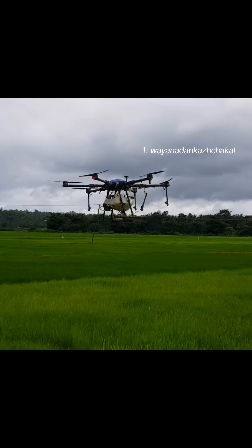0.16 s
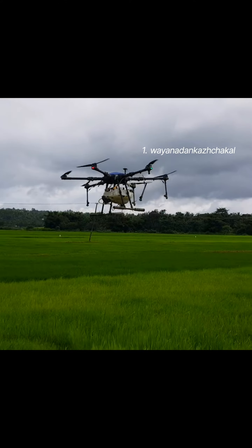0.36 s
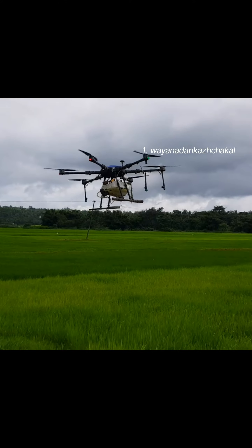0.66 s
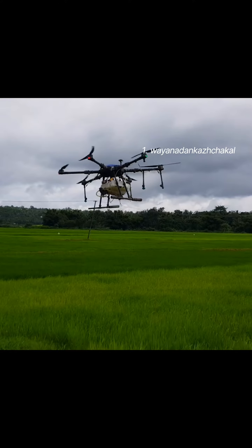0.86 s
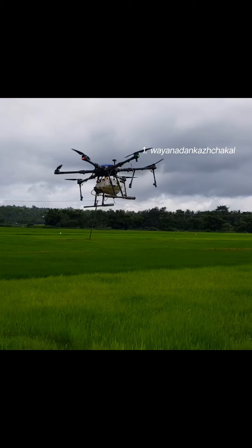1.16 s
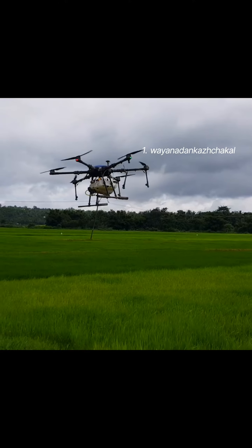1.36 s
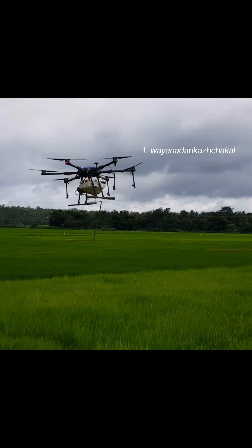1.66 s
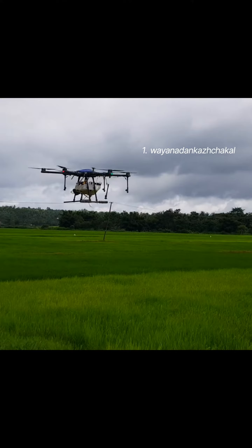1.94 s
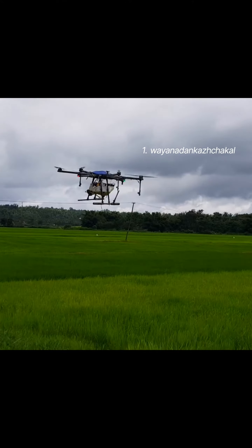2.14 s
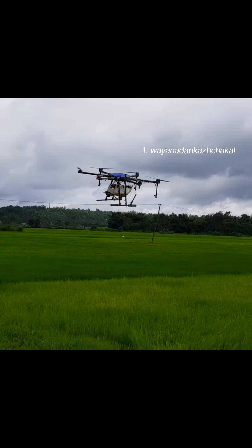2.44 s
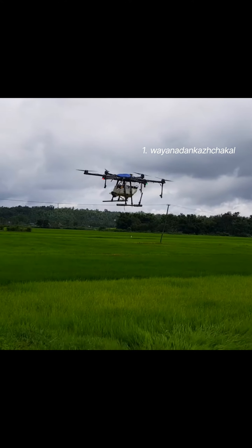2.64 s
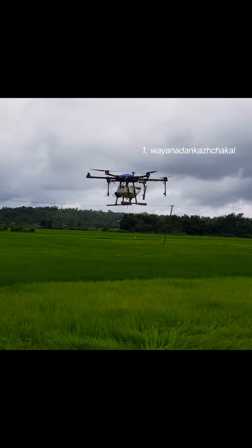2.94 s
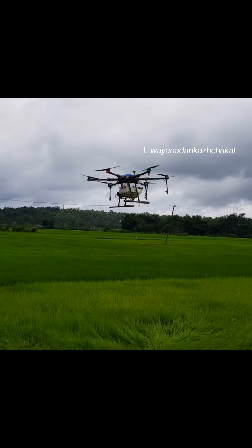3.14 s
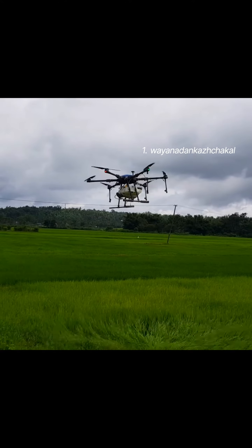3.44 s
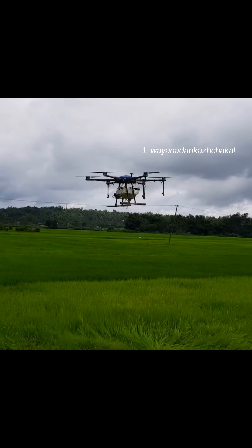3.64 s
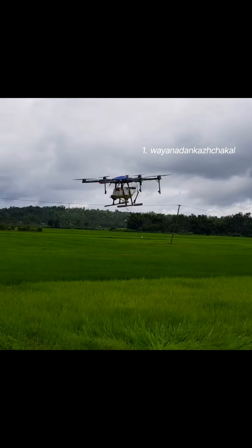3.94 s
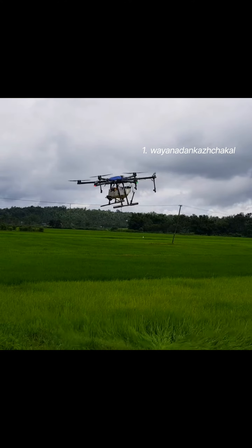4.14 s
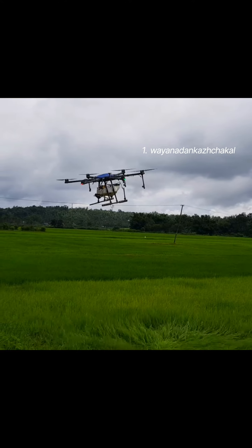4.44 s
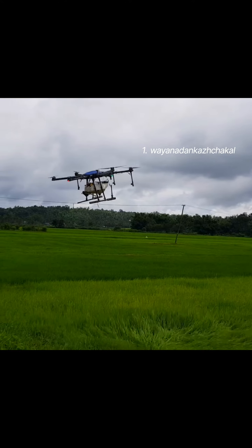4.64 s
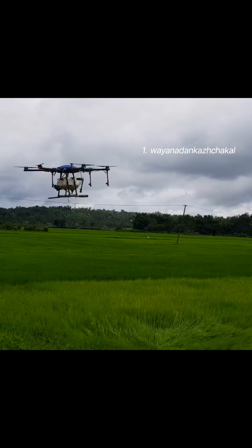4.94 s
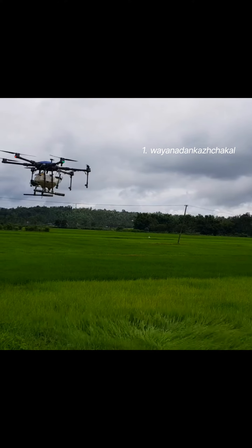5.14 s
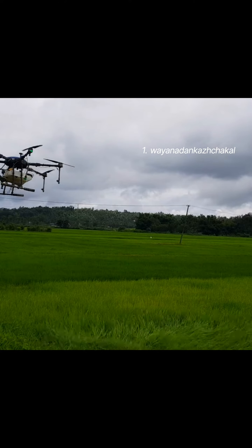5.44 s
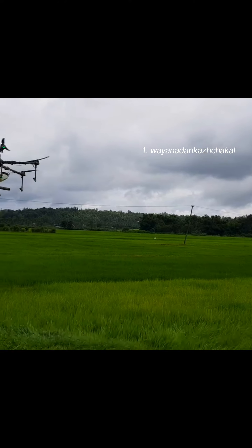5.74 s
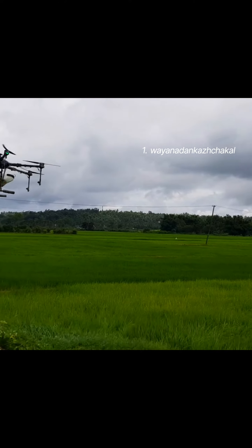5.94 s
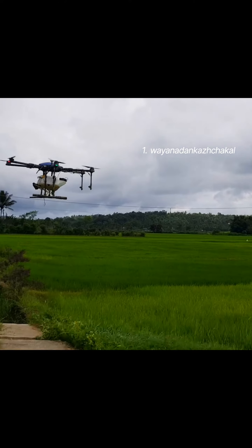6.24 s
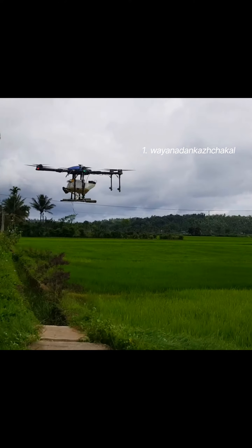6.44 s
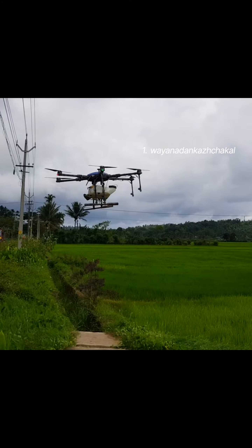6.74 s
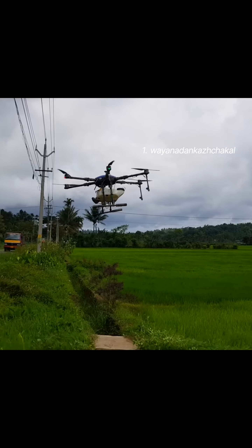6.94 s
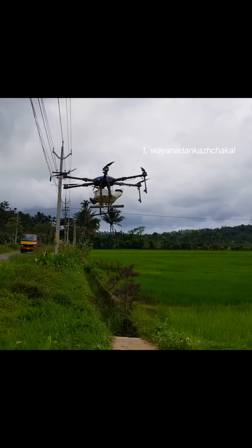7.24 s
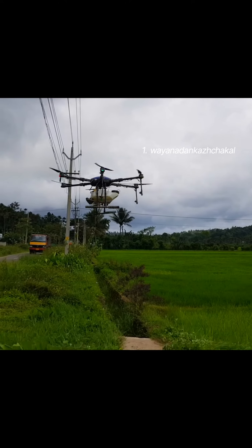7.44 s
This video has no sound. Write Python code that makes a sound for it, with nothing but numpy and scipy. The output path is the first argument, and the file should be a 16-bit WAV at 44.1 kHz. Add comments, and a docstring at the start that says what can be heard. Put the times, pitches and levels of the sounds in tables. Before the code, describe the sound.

A large six-rotor drone hovers low and close outdoors, its blades droning in a wavering, beating hum with airy rush and hiss.

```python
"""A six-rotor spraying drone hovers and sidles low over an open paddy field, a few metres from two mic ports.
From the start four fast and two slower rotors beat as their wandering speeds drive harmonic tones;
shaped noise makes the downwash rumble and the blades rush, and one tip chirps once a turn in the hiss.
Wakes slap a rotor now and then, hardest near 3.5 s; chirp and hiss sink after 2 s.
The chirp returns near 5 s and climbs in pitch to the end, while the treble leans to the right."""
import sys
import numpy as np
from scipy import signal
from scipy.fft import rfft, irfft, next_fast_len
from scipy.io import wavfile
from scipy.ndimage import uniform_filter1d

SR = 44100
rng = np.random.default_rng(int(sys.argv[2]) if len(sys.argv) > 2 else 0)


def file_out(sig):
    """Save sig as 16-bit WAV at sys.argv[1]."""
    # one column per channel
    cols = np.atleast_2d(sig).T
    # limit, then scale
    lim = np.clip(cols, -1, 1)
    pcm = np.round(lim * 32767).astype(np.int16)
    wavfile.write(sys.argv[1], SR, pcm)


N = 334760
THIN = 8  # samples per step of the coarse clock, which is enough for the tones
T = np.arange(N) / SR
T_LOW = T[::THIN]

# All level tables are relative: the layers that read them add constant trims.
# air rushing off the blades: (time [s], level [dB])
RUSH_LEVEL = [(0, -37.5), (.2, -39.5), (.62, -36.5), (1.15, -37.5), (1.28, -36), (1.5, -39), (1.72, -38),
              (1.95, -39.5), (2.3, -37), (2.6, -38), (2.92, -40.5), (3.45, -37), (3.65, -39), (4, -41.5),
              (4.72, -40), (5.12, -40.5), (5.27, -35.5), (5.8, -36), (6.08, -38), (6.24, -36), (6.36, -40),
              (6.8, -41), (7.42, -39), (7.59, -42.5)]
# hiss at the blade tips: (time [s], level [dB])
TIP_HISS_LEVEL = [(0, -41), (.3, -37.5), (.6, -36.5), (1.4, -38), (1.8, -41), (2.1, -45), (2.9, -45.5),
                  (3.25, -44), (3.48, -43), (3.8, -45.5), (4.55, -44.5), (4.9, -42), (5.15, -42.5),
                  (5.55, -38.5), (6.15, -43), (6.65, -44), (7.05, -43.5), (7.59, -44)]
# strength of the downwash: (time [s], level [dB])
DOWNWASH_LEVEL = [(0, -37), (.25, -40), (.65, -42), (.8, -29), (.98, -38), (1.55, -37), (2.1, -41),
                  (2.75, -40), (2.83, -35), (2.95, -38), (3.25, -50), (3.44, -33), (3.7, -40), (4.0, -41.5),
                  (4.95, -40), (5.25, -37.5), (5.78, -37.5), (6.2, -38.5), (6.52, -44), (7.05, -38),
                  (7.59, -37.5)]


def from_db(db):
    """Decibels to gain."""
    return 10 ** (np.asarray(db) / 20)


# the four fast rotors; the far ones are shaded by the body and the tank
NEAR_GAIN = from_db([2.0, -1.5, -0.5, -4.0])


def rms_one(x):
    """Scale to unit power."""
    return x / np.sqrt(np.mean(np.abs(x) ** 2) + 1e-20)


def in_time(rows, t):
    """The columns of a curve table at times t."""
    s, *columns = np.transpose(rows)
    return [np.interp(t, s, c) for c in columns]


def at_hz(points, hz):
    """Read a spectrum on a log-frequency axis."""
    freq, value = np.transpose(points)
    return np.interp(np.log(np.maximum(hz, 1)), np.log(freq), value)


def highpass(sound, order, hz):
    """The part of a sound above a corner frequency, without delay."""
    return signal.sosfiltfilt(signal.butter(order, hz, "high", fs=SR, output="sos"), sound)


def drift(rate):
    """Smooth random wander of unit power on the coarse clock; rate is its corner in Hz."""
    settle = SR // THIN  # one second for the smoothing to settle
    r = np.exp(-2 * np.pi * rate * THIN / SR)
    slow = signal.lfilter([1], [1, -2 * r, r * r], rng.standard_normal(len(T_LOW) + settle))
    return rms_one(slow[settle:])


def shaft_angle(blade_hz):
    """Two blades pass on every turn of the shaft."""
    return np.pi * np.cumsum(blade_hz) * THIN / SR + rng.uniform(0, 2 * np.pi)


def partial(blade_hz, order, rough, flutter_rate):
    """One shaft harmonic of a rotor, shaken by gusty inflow."""
    phase = order * shaft_angle(blade_hz)
    in_phase = 1 + rough * drift(flutter_rate)
    quadrature = rough * drift(flutter_rate)
    return np.cos(phase) * in_phase + np.sin(phase) * quadrature


def overtones(blade_hz, orders, shape, odd_db, rough, flutter_rate):
    """A run of shaft harmonics of one rotor; unequal blades give the odd ones."""
    # how much the unequal blades show, before each layer's offset:
    # (time [s], odd shaft harmonics against even ones [dB])
    odd_level = [(0, -4), (1.7, -12.5), (3.0, -7), (7.59, -1)]
    odd = from_db(odd_db + in_time(odd_level, T_LOW)[0])
    out = 0
    for k in orders:
        strength = from_db(at_hz(shape, k * blade_hz / 2))
        if k % 2:
            strength = strength * odd
        out = out + strength * partial(blade_hz, k, rough, flutter_rate)
    return out


def steady(x, seconds):
    """Even out the level over stretches of this length; quicker beats stay."""
    power = uniform_filter1d(np.abs(rms_one(x)) ** 2, max(1, int(seconds * SR / THIN)))
    return x / np.sqrt(np.mean(np.abs(x) ** 2) * (power + 0.03))


def spread(voices, width):
    """Alternate voices lean to opposite ports around a steadied sum."""
    voices = np.array(voices)
    side = rms_one(voices[::2].sum(axis=0) - voices[1::2].sum(axis=0))
    return steady(voices.sum(axis=0), seconds=0.33) + width * side * [[1], [-1]]


def air_noise(shape, gust_db):
    """Stereo turbulence: each octave gusts on its own, and the ports' likeness varies with frequency."""
    # the two microphone ports: (frequency [Hz], likeness [correlation, -1 to 1])
    port_likeness = [(30, 0.17), (60, .05), (130, 1), (300, 0.76), (640, 0.88), (1400, 0.66), (3100, 0.44),
                     (5500, 0.041), (15000, 0.048)]
    size = next_fast_len(N, True)
    hz = np.arange(size // 2 + 1) * SR / size
    mid, side = rfft(rng.standard_normal((2, size))) * from_db(at_hz(shape, hz))
    alike = np.clip(at_hz(port_likeness, hz), -1, 1)
    spectrum = np.sqrt(1 + alike) * mid + np.sqrt(1 - alike) * side * [[1], [-1]]
    octave = np.log2(np.clip(hz, shape[0][0], shape[-1][0]) / shape[0][0])
    out = 0
    for k in range(int(octave[-1]) + 2):
        overlap = np.maximum(1 - np.abs(octave - k), 0)
        band = irfft(spectrum * overlap, size)[:, :N]
        out = out + band * from_db(gust_db * np.interp(T, T_LOW, drift(12.5)))
    return rms_one(out)


def rotor_speeds(trim_hz, jitter_hz, fast_gap_hz, slow_gap_hz):
    """Three rotors set the pace; the other three follow their neighbours, each with a trim of its own."""
    # rotor speeds before random jitter: (time [s], blade passes [per s])
    lead_speed = [(0, 162), (.24, 152), (1, 162), (1.6, 160.5), (1.75, 165), (2, 160), (2.3, 163),
                  (2.85, 164), (3, 158.5), (3.5, 164), (3.8, 159), (3.97, 167), (4.25, 170), (4.87, 166),
                  (5, 158), (5.58, 163), (5.76, 168), (6.6, 169), (6.9, 163), (7.6, 163)]
    second_speed = [(0, 165), (.26, 147), (.46, 155), (1, 161), (1.77, 166), (2.03, 155), (2.83, 155),
                    (3.3, 163), (3.43, 177), (3.51, 177), (3.62, 166), (3.75, 160), (4.15, 171),
                    (5.12, 159), (5.42, 166), (6.6, 174), (6.88, 162), (7.6, 165)]
    slow_speed = [(0, 126), (1, 131), (1.95, 127), (2.85, 134), (3.1, 126), (3.6, 124), (4.2, 132),
                  (5.05, 128), (5.38, 133), (6.7, 128), (7, 124), (7.6, 128)]
    lead, second, slow = (in_time(rows, T_LOW)[0] for rows in (lead_speed, second_speed, slow_speed))
    lead_follower = lead + fast_gap_hz + trim_hz * drift(1.3)
    second_follower = second - 2.5 + trim_hz * drift(1.27)
    slow_follower = slow - slow_gap_hz + trim_hz / 2 * drift(2.516)
    groups = [lead, lead_follower, second, second_follower], [slow, slow_follower]
    return [[hz + jitter_hz * drift(12.46) for hz in group] for group in groups]


def beating_hum(blade_hz):
    """Like rotors lose one blade pass on the nearest of them from each beat to the next."""
    # the fast rotors fall out of step and their hums cancel:
    # (time [s], depth of the beat [dB], negative where they add instead)
    beats = [(.02, 4), (.15, 17), (.24, 0), (.42, 4), (.62, 18), (.71, 19), (.79, 9), (.89, 7), (1.01, 18),
             (1.09, 16), (1.22, 2), (1.37, 2), (1.58, 6), (1.7, 1), (1.81, 19), (1.89, 6), (2.09, 8),
             (2.22, 15), (2.35, -4), (2.48, 14), (2.63, 19), (2.74, 16), (2.95, 7), (3.22, 0), (3.42, 10),
             (3.57, 7), (3.71, 23), (3.9, 27), (4.06, 0), (4.16, 9), (4.3, 14), (4.52, 4), (4.829, 1),
             (4.97, 12), (5.1, 0), (5.25, 3), (5.4, 5), (5.6, 13), (5.73, 2), (5.91, 9), (6.05, 1),
             (6.19, 9), (6.33, 8), (6.46, 5), (6.57, 15), (6.68, 15), (6.83, 3), (6.99, 12), (7.16, 22),
             (7.27, -7), (7.42, 17), (7.55, 10)]
    s, depth_db = np.transpose(beats)
    slip = -2 * np.pi * np.interp(T_LOW, s, np.arange(len(s)))
    trough = from_db(-np.interp(T_LOW, s, depth_db))
    others = (1 - trough) / (1 + trough)
    tone = np.exp(2j * shaft_angle(blade_hz)) * (1 - others * np.exp(1j * slip))
    return np.sqrt(2 / (1 + others ** 2)) * tone.real


def slow_hum(speeds, follower_db):
    """The blade tones of the two slow rotors beat a few times a second."""
    first, second = (np.cos(2 * shaft_angle(hz)) for hz in speeds)
    return rms_one(first + from_db(follower_db) * second)


def blade_hum(fast, slow):
    """The blade-passing tones of the fast and slow rotors."""
    # fast-rotor hum averaged over a beat, then slow-rotor hum: (time [s], level [dB])
    fast_level = [(0, -27), (.17, -36.5), (.36, -24.5), (.49, -24.5), (.65, -36), (.82, -26.5),
                  (.94, -24.5), (1.04, -40), (1.14, -25), (1.27, -23.5), (1.37, -42), (1.5, -25),
                  (1.86, -37), (2.0, -31), (2.54, -31.5), (2.68, -33.5), (3.1, -26), (3.38, -28.5),
                  (3.5, -29.5), (3.62, -35), (3.98, -29), (4.22, -25), (4.55, -33), (4.74, -25.5),
                  (4.89, -28), (5.0, -40), (5.18, -26.5), (5.32, -28.5), (5.6, -36), (5.84, -26.5),
                  (6.05, -36.5), (6.3, -28), (6.9, -28), (7.35, -36.5), (7.59, -53)]
    slow_level = [(0, -31), (.22, -47), (.38, -32), (1.15, -35), (1.7, -39), (2.3, -35), (2.9, -33.5),
                  (3.5, -48), (3.8, -39), (4.5, -34.5), (5, -40), (5.27, -33), (5.9, -37), (6.5, -36),
                  (7.25, -38), (7.37, -41), (7.59, -33.5)]
    fast_gain = from_db(in_time(fast_level, T_LOW)[0] - 4.0)
    slow_gain = from_db(in_time(slow_level, T_LOW)[0] - 4.5)
    return fast_gain * beating_hum(fast[0]) + slow_gain * slow_hum(slow, follower_db=-7.0)


def throb(fast, slow, fast_db):
    """Unbalanced propellers pulse the downwash once a turn."""
    once = [np.cos(shaft_angle(hz)) for hz in slow]
    once += [from_db(fast_db) * np.cos(shaft_angle(fast[1]))]
    return from_db(in_time(DOWNWASH_LEVEL, T_LOW)[0] - 3.0) * spread(once, width=0.16)


def burr(rotors, slow):
    """Rough third shaft harmonics, with the fourth of the slow rotors, between the first two blade tones."""
    # burr: (time [s], level [dB])
    burr_level = [(0, -36), (.25, -45), (.65, -57), (.85, -39.5), (2.5, -40), (2.9, -36.5), (4.2, -39.5),
                  (5.05, -39), (5.5, -36), (6.8, -35.5), (7.59, -39.5)]
    voices = [near * partial(hz, order=3, rough=0.53, flutter_rate=4.9) for hz, near in rotors[:2]]
    voices += [partial(hz, order=4, rough=0.37, flutter_rate=3.0) for hz in slow]
    voices += [from_db(-4.5) * partial(slow[0], order=3, rough=0.53, flutter_rate=5.0)]
    return from_db(in_time(burr_level, T_LOW)[0] - 5.0) * spread(voices, width=0.23)


def second_blade_tone(rotors):
    """The octave of the fast rotors' hum: four shaft cycles a turn."""
    # second blade tone: (time [s], level [dB])
    octave_level = [(0, -39), (.1, -33), (.17, -51), (.34, -51), (0.409, -30), (.6, -37), (.82, -31.5),
                    (1.7, -32), (1.95, -39.5), (2.2, -43), (2.3, -39.5), (2.85, -38.5), (2.99, -45),
                    (3.12, -40.5), (3.45, -31), (3.65, -40), (3.8, -53), (3.93, -39.5), (4.48, -43),
                    (4.58, -39), (5.1, -40), (5.2, -31), (5.35, -38.5), (6.05, -37.5), (6.24, -38),
                    (6.5, -38), (7.59, -40.5)]
    voices = [near * partial(hz, order=4, rough=0.31, flutter_rate=5.5) for hz, near in rotors]
    voices[1] = voices[1] * from_db(1.5)
    return from_db(in_time(octave_level, T_LOW)[0] - 4.5) * spread(voices, width=0.15)


def growl_and_buzz(rotors, slow):
    """Low and middle runs of shaft harmonics from all six rotors."""
    # overtones: (time [s], low growl level [dB], middle buzz level [dB])
    tone_levels = [(0.0, -32.5, -34), (0.24, -44, -40), (0.45, -30.5, -40.5), (0.65, -37.5, -43),
                   (1.0, -29.5, -37.5), (1.2, -35, -39), (1.42, -29, -35), (1.78, -28.5, -38.5),
                   (1.93, -40, -42), (2.5, -36.5, -41), (2.96, -34, -45), (3.1, -29.5, -36),
                   (3.4, -31, -39.5), (3.82, -34, -49), (4.14, -36, -40), (5.1, -36.5, -38.5),
                   (5.3, -31.5, -34.5), (5.55, -35.5, -38), (5.8, -34, -31.5), (6.05, -35, -33.5),
                   (6.16, -36, -39), (6.25, -36.5, -35), (6.7, -34.5, -33.5), (7.31, -32.5, -32),
                   (7.59, -37, -37.5)]
    # strength of the overtones in each run: (frequency [Hz], level [dB])
    growl_shape = [(370, -4.5), (415, 3), (490, 1), (540, 1.5)]
    buzz_shape = [(500, -13), (590, 2), (670, 5), (745, -23)]
    growl_db, buzz_db = in_time(tone_levels, T_LOW)
    growl = [near * overtones(hz, range(5, 7), growl_shape, odd_db=-0.5, rough=0.14, flutter_rate=2.1)
             for hz, near in rotors]
    growl[0] = growl[0] * from_db(5.5)  # the nearest rotor growls loudest
    growl += [from_db(-2.0) * overtones(hz, range(6, 9), growl_shape, odd_db=4.0, rough=0.36, flutter_rate=8.4)
              for hz in slow]
    buzz = [near * overtones(hz, range(7, 10), buzz_shape, odd_db=7.0, rough=0.19, flutter_rate=4.4)
            for hz, near in rotors]
    buzz += [from_db(4.5) * overtones(hz, range(9, 12), buzz_shape, odd_db=3.5, rough=0.057, flutter_rate=11)
             for hz in slow]
    growl_sound = from_db(growl_db - 5.0) * spread(growl, width=0.18)
    return growl_sound + from_db(buzz_db - 4.5) * spread(buzz, width=0.25)


def rasp(rotors):
    """High shaft harmonics of three fast rotors, shaken hard by the inflow."""
    # rasp: (time [s], level [dB])
    rasp_level = [(0, -41), (1.25, -43.5), (2.5, -45.5), (3.5, -41), (3.9, -49), (4.5, -47), (5.1, -52),
                  (5.3, -45), (6.25, -44.5), (7.1, -43), (7.59, -40)]
    # strength of its overtones: (frequency [Hz], level [dB])
    rasp_shape = [(750, -10.5), (1150, 1), (1450, -9), (1650, -2), (2000, -13.5), (2600, -2)]
    voices = [near * overtones(hz, range(10, 31), rasp_shape, odd_db=-1.0, rough=1.0, flutter_rate=9.3)
              for hz, near in rotors[:3]]
    return from_db(in_time(rasp_level, T_LOW)[0] - 2.5) * spread(voices, width=0.3)


def rotor_tones(fast, slow):
    """Hum, throb, burr, octave, growl, buzz and rasp of the six rotors."""
    rotors = list(zip(fast, NEAR_GAIN))
    out = blade_hum(fast, slow) + throb(fast, slow, fast_db=-1.0)
    out = out + burr(rotors, slow) + second_blade_tone(rotors)
    out = out + growl_and_buzz(rotors, slow) + rasp(rotors)
    return signal.resample_poly(out, THIN, 1, axis=1)[:, :N]


def downwash_rumble():
    """Low turbulence in the air driven down by the rotors."""
    # downwash turbulence: (frequency [Hz], density [dB per Hz])
    wash_shape = [(12, -24), (25, -19), (36, 2), (49, 13), (70, 15), (100, 3), (200, -2), (400, -7),
                  (1000, -38)]
    return from_db(in_time(DOWNWASH_LEVEL, T)[0] - 3.5) * air_noise(wash_shape, gust_db=2)


def chopped(noise, blade_hz, share):
    """The next blade cuts the same eddy again, so part of the noise repeats one blade pass later."""
    earlier = T - 1 / np.interp(T, T_LOW, blade_hz)
    repeat = np.array([np.interp(earlier, T, channel) for channel in noise])
    return rms_one(noise + share * repeat)


def with_air(usual_db, rush_share, hiss_share):
    """Gain of a layer that swells with the blade rush and the tip hiss, by these shares of their swings in dB."""
    (rush_db,), (hiss_db,) = in_time(RUSH_LEVEL, T), in_time(TIP_HISS_LEVEL, T)
    rush_swing, hiss_swing = rush_db + 38.5, hiss_db + 41  # from their usual levels
    return from_db(usual_db + rush_share * rush_swing + hiss_share * hiss_swing)


def blade_rush(fast, swish, bright_hz):
    """Trailing-edge noise swells as each blade swings towards the listener, and brightens with the tip hiss."""
    # turbulence: (frequency [Hz], density [dB per Hz])
    rush_shape = [(20, 0), (50, 3), (100, 6.5), (230, 1.5), (400, 2), (750, 0), (1400, -2.5), (2000, -2),
                  (3000, -1.6), (4200, 1), (5200, -3), (6200, -7), (7000, -18), (8000, -43), (9500, -65)]
    passing = sum(np.cos(2 * shaft_angle(hz)) for hz in fast[:2])
    swell = rms_one(1 + swish * np.interp(T, T_LOW, passing))
    noise = chopped(air_noise(rush_shape, gust_db=1.0), fast[0], share=0.17)
    treble = highpass(noise, 4, bright_hz)
    noise = noise - treble + treble * with_air(usual_db=-2.0, rush_share=0.026, hiss_share=0.52)
    return from_db(in_time(RUSH_LEVEL, T)[0] + 4.5) * swell * noise


def tip_whistle(blade_hz, centre_hz, doppler, beam, line_hz, uneven_db):
    """Vortices shed from one tip whistle; its approach sweeps the pitch up in a short chirp on every turn."""
    angle = np.interp(T, T_LOW, shaft_angle(blade_hz))
    wander = np.array([np.interp(T, T_LOW, drift(1200)) for port in range(2)])
    pitch = centre_hz * (1 + doppler * np.sin(angle)) + line_hz * wander
    uneven = from_db(uneven_db * np.interp(T, T_LOW, drift(40)))
    facing = np.exp(beam * (np.cos(angle) - 1)) * uneven
    chirps = facing * np.cos(2 * np.pi * np.cumsum(pitch, axis=1) / SR)
    return rms_one(signal.sosfilt(signal.butter(8, 11300, "high", fs=SR, output="sos"), chirps))


def tip_air(fast, top_hz):
    """The blade tips hiss together, the top of the hiss coming and going; one chirps whenever it faces the listener."""
    # the whistling tip as the drone turns: (time [s], chirp centre [Hz], level [dB])
    tip_aim = [(0, 13000, -46), (.17, 13100, -36), (.27, 13100, -46), (.36, 13360, -34),
               (1.45, 14000, -35.5), (1.85, 13740, -42), (2.1, 13800, -50), (4.55, 13970, -54),
               (4.82, 14000, -40), (5.28, 13800, -43), (5.5, 14200, -37), (5.9, 14400, -39),
               (6.2, 14570, -44), (6.65, 15000, -45), (7.08, 15500, -44), (7.59, 15600, -42)]
    # turbulence at the tips: (frequency [Hz], density [dB per Hz])
    hiss_shape = [(6000, -54), (8000, -65), (9000, -18.5), (10000, -7.5), (11000, 0.5), (12200, 4.5),
                  (13500, 1.5), (16000, -2.5)]
    # top of the hiss and chirp against the rest: (time [s], level [dB])
    top_level = [(.17, 3), (.26, -9), (.38, -2.5), (1.5, 1), (2.1, 1.5), (4.9, 3), (5.12, -2), (5.55, 4.5),
                 (6.6, 2.5), (7.1, 7.5)]
    (hiss_db,), (centre_hz, whistle_db) = in_time(TIP_HISS_LEVEL, T), in_time(tip_aim, T)
    whistle = tip_whistle(fast[1], centre_hz, doppler=0.3, beam=3.4, line_hz=1100, uneven_db=1.5)
    hiss = from_db(hiss_db + 3.5) * air_noise(hiss_shape, gust_db=0.7)
    air = hiss + from_db(whistle_db - 2.0) * whistle
    return air + highpass(air, 4, top_hz) * (from_db(in_time(top_level, T)[0]) - 1)


def wake_level(peaks):
    """The slap builds as the rotor enters a wake and fades as it leaves; a little is always there."""
    rise, fall, rest_db = 37, 54, -56  # rise and fall in dB per s
    ramps = [db - np.maximum(rise * (s - T), fall * (T - s)) for s, db in peaks]
    return np.maximum(np.max(ramps, axis=0), rest_db)


def blade_slap(blade_hz, peaks, shape, uneven, jitter, smear, crack_db, crack_growth):
    """Each blade hits a ragged wake vortex: a smeared thump of uneven strength; harder hits crack more."""
    slap_db = wake_level(peaks)
    angle = 2 * shaft_angle(blade_hz) + jitter * drift(40)
    thumps = 0
    for k in range(2, 16):
        thumps = thumps + from_db(at_hz(shape, k * blade_hz)) * np.sin(k * angle + smear * drift(0.39))
    thumps = signal.resample_poly(rms_one(thumps * (1 + uneven * drift(39))), THIN, 1)[:N]
    strike = ((1 + np.cos(np.interp(T, T_LOW, angle))) / 2) ** 3
    crack_band = signal.butter(3, [1100, 2800], "band", fs=SR, output="sos")
    crack = rms_one(strike * signal.sosfilt(crack_band, rng.standard_normal(N)))
    # crack_db holds for a slap level of -32 dB; crack_growth is dB per dB of slap
    crack_gain = from_db(crack_db + crack_growth * (slap_db + 32))
    return from_db(slap_db) * (thumps + crack_gain * crack)


def wake_slaps(blade_hz):
    """Two layers of blade slap at one rotor's pace: a cracking slap and a brighter, more uneven graze."""
    # wake passages: (time [s], slap peak [dB], graze peak [dB])
    wakes = [(0.03, -45, -40), (1.4, -55, -47), (2.55, -43, -44), (3.17, -41, -39), (3.47, -31.5, -45),
             (5.8, -45, -46)]
    # strength of the thump's overtones: (frequency [Hz], level [dB])
    slap_shape = [(330, -17), (490, 1), (640, 3), (710, 2), (880, -0.5), (1060, -9), (1240, -4.5),
                  (1420, -46), (1600, -1.5), (1780, -36), (1950, -5.5), (2600, -19)]
    graze_shape = [(330, -2), (480, -4), (640, 2), (800, 0), (960, 10), (1120, 0.5), (1290, 7), (1450, -25),
                   (1600, -10), (2600, 2)]
    slap = blade_slap(blade_hz, [(s, db) for s, db, _ in wakes], slap_shape,
                      uneven=0.17, jitter=0.038, smear=1.47, crack_db=-8, crack_growth=0.51)
    graze = blade_slap(blade_hz, [(s, db) for s, _, db in wakes], graze_shape,
                       uneven=0.46, jitter=0.033, smear=1.37, crack_db=-12, crack_growth=0.3)
    return slap + graze


def leaning(sound, above_hz, share):
    """Only the treble is shaded from one port or the other."""
    # lean as the drone moves, before each layer's share: (time [s], left minus right [dB])
    treble_lean = [(0, 4), (.5, 2), (1.7, 4), (2.1, -1.5), (2.6, 1), (3.1, -0.5), (4.2, 2.5), (5, 1),
                   (5.6, -3), (6.05, -8), (6.4, -3.5), (7.59, -2.5)]
    lean = from_db(share * in_time(treble_lean, T)[0] * [[.5], [-.5]])
    return sound + highpass(sound, 2, above_hz) * (lean - 1)


def placed(sound):
    """The port nearer to the drone hears it a little earlier."""
    # direction of the drone: (time [s], lead of the left port [samples])
    bearing = [(0, 3), (1.8, 1.5), (4.1, 1.9), (5.7, 4.5), (6.3, 1), (7.59, -1)]
    lead = in_time(bearing, T)[0] / SR
    return np.array([np.interp(T + lead / 2, T, sound[0]), np.interp(T - lead / 2, T, sound[1])])


def scene():
    """Rotor tones, blade noise and downwash in the open air."""
    fast, slow = rotor_speeds(trim_hz=2.0, jitter_hz=0.508, fast_gap_hz=4.0, slow_gap_hz=4.5)
    tones = rotor_tones(fast, slow)
    downwash = downwash_rumble()
    rush = leaning(blade_rush(fast, swish=0.09, bright_hz=4800), above_hz=2600, share=0.61)
    hiss = leaning(tip_air(fast, top_hz=13500), above_hz=2200, share=0.42)
    slaps = wake_slaps(fast[2])
    return placed(tones + slaps + rush) + hiss + downwash


def record(dry):
    """Each port colours the sound in its own way; the top is cut steeply."""
    # the two microphone ports: (frequency [Hz], left minus right [dB])
    port_balance = [(60, -3), (150, -4), (700, -4), (1300, -1.5), (2000, -0.7), (2900, -0.5), (4300, -8),
                    (6000, -7.5), (7100, 3), (9000, 1), (10400, 3), (12500, 1.5), (15000, 0)]
    cutoff_hz = 15850
    size = next_fast_len(N + SR // 10, True)
    hz = np.arange(size // 2 + 1) * SR / size
    ports = from_db(at_hz(port_balance, hz) * [[.5], [-.5]])
    low_pass = 1 / np.sqrt(1 + (hz / cutoff_hz) ** 400)
    return irfft(rfft(dry, size) * ports * low_pass, size)[:, :N]


dry = scene()
out = record(dry)
file_out(out)
```